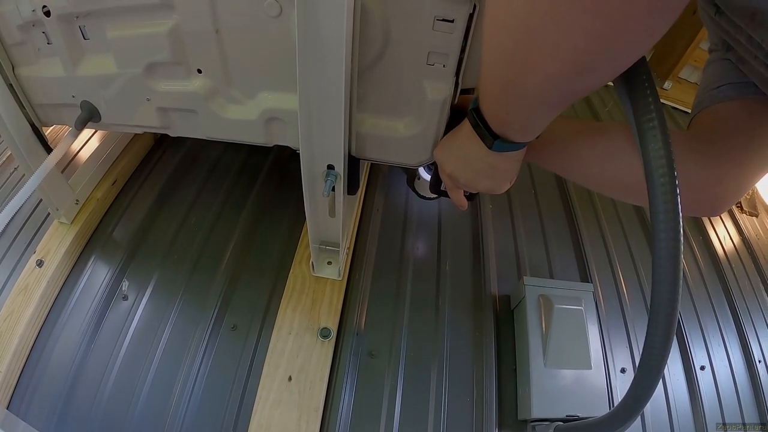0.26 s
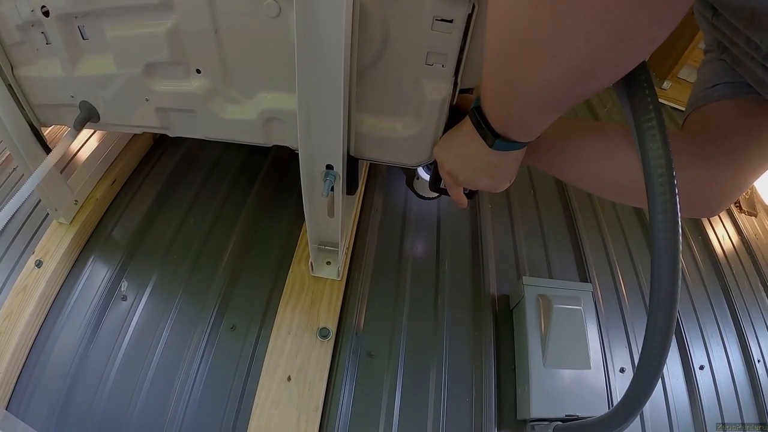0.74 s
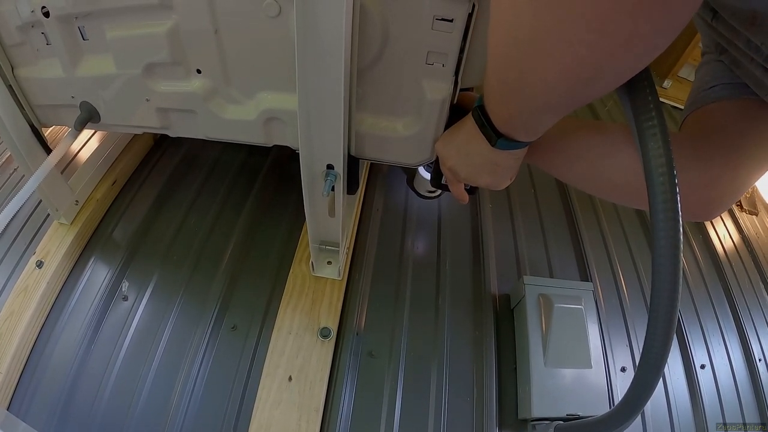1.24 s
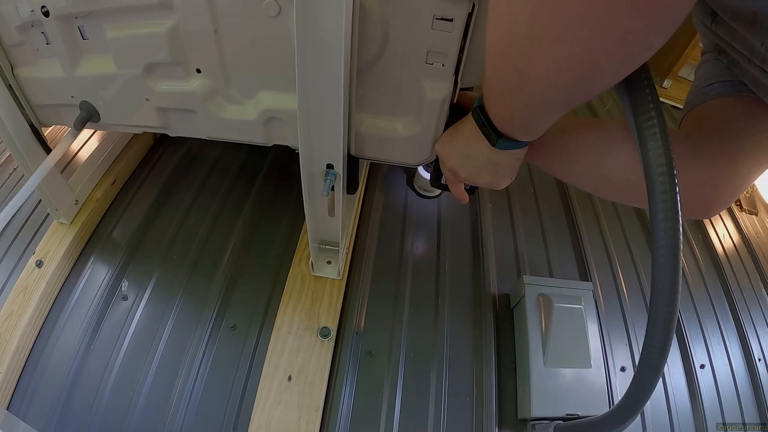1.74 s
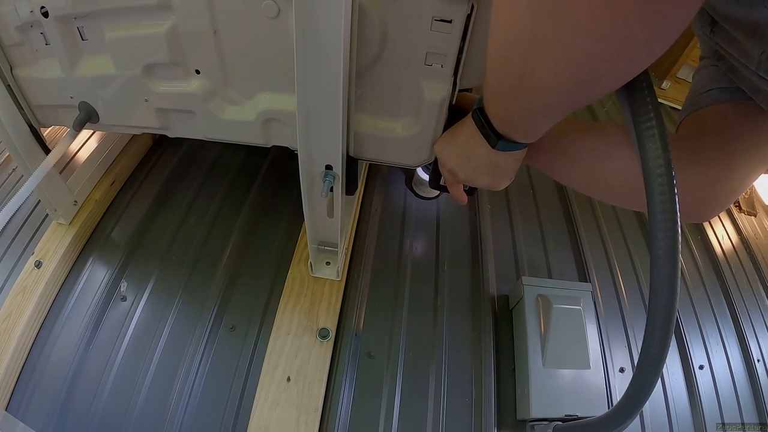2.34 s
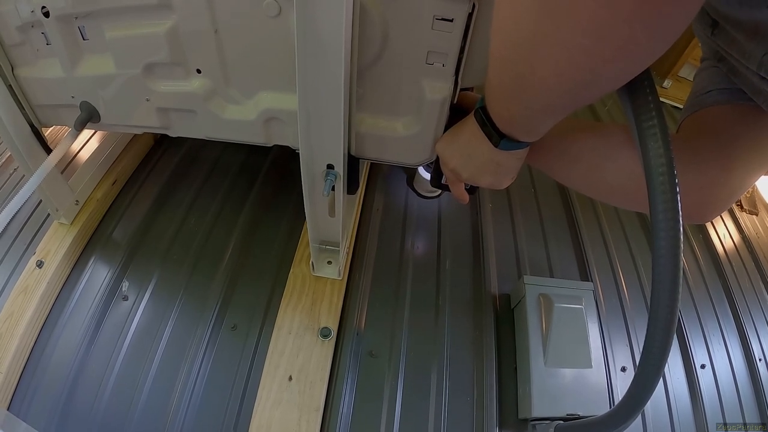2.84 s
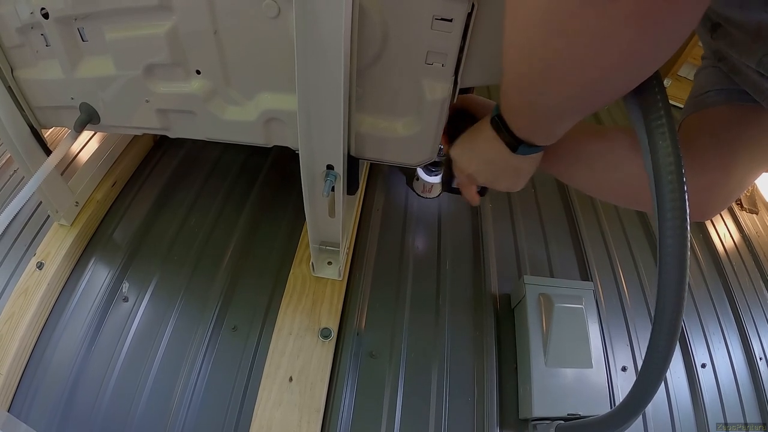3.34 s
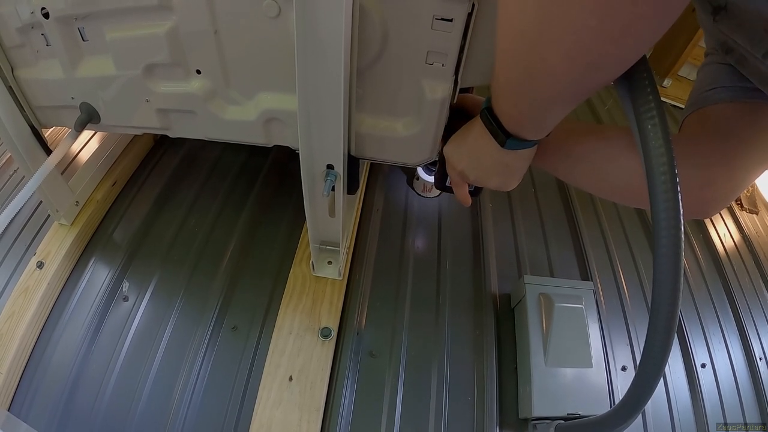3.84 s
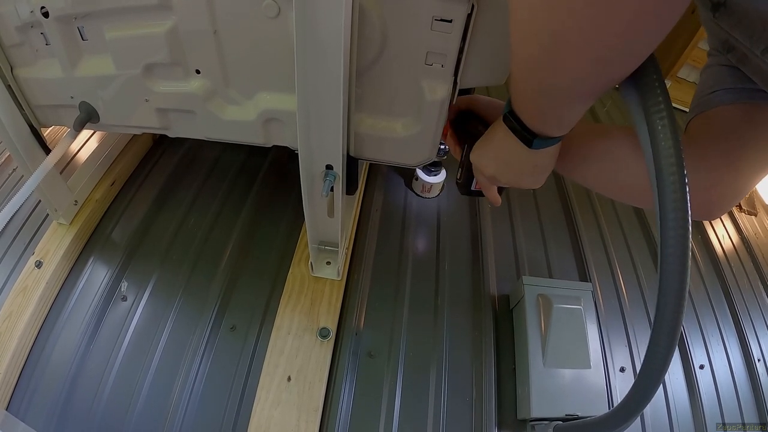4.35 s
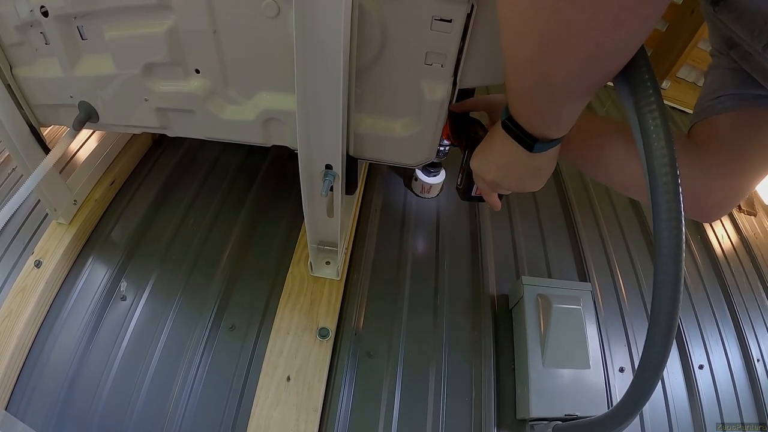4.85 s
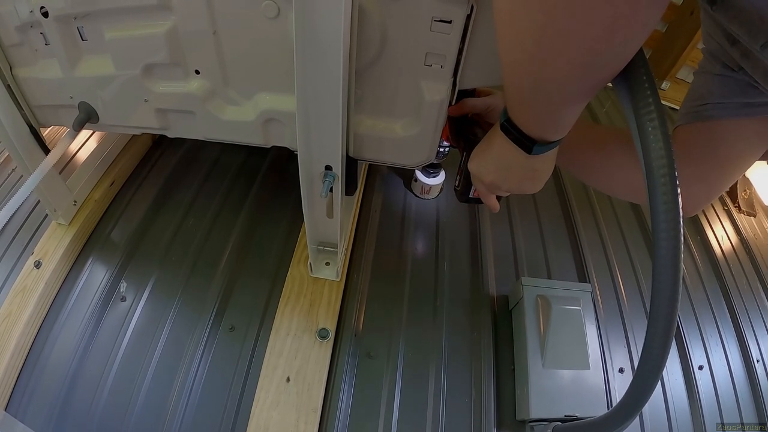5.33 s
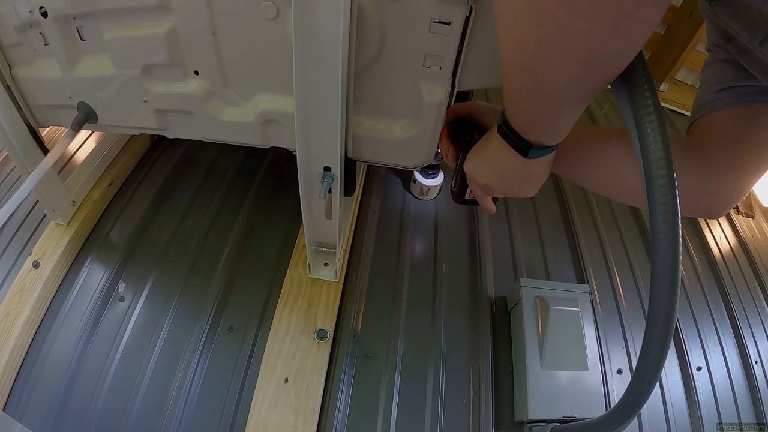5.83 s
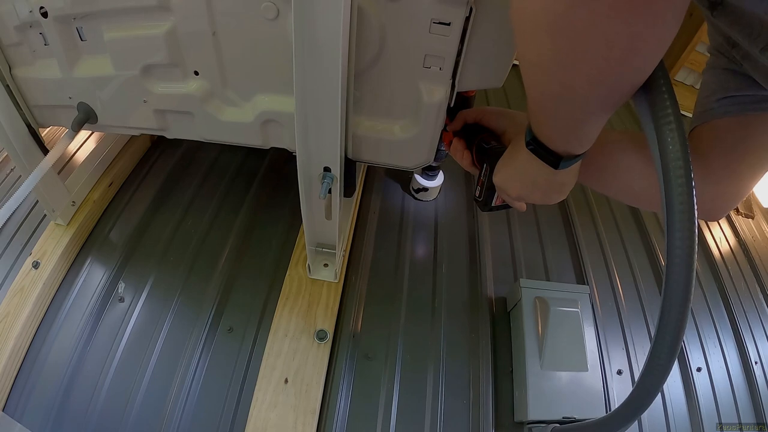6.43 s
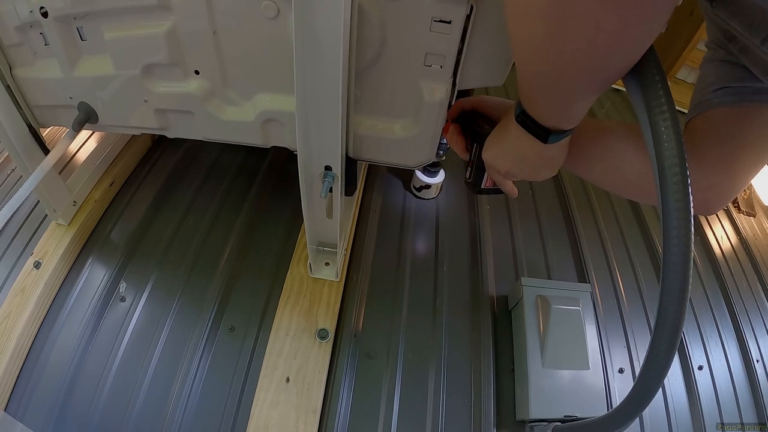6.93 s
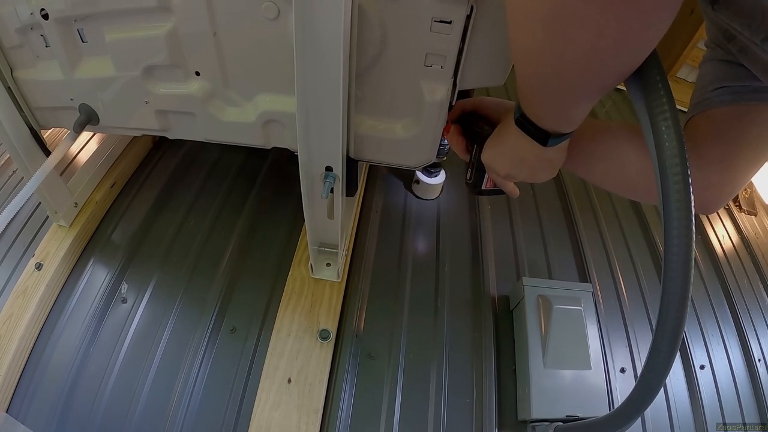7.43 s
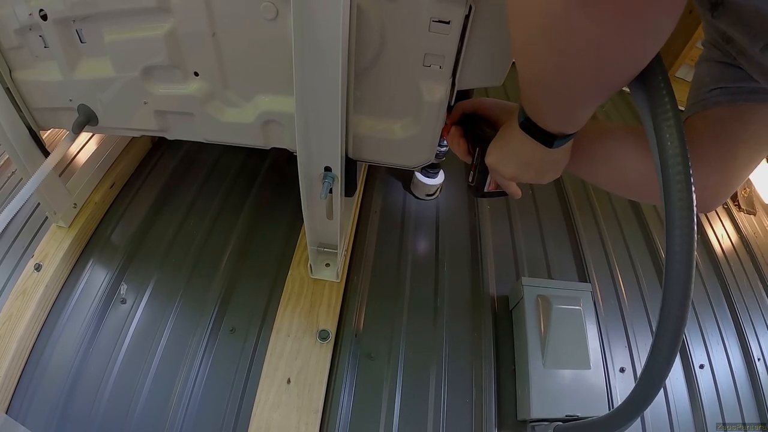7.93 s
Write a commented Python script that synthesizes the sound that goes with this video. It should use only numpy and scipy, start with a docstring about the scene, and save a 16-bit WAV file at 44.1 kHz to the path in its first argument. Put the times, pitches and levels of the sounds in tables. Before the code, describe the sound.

Soft bumps, then a cordless drill's hole saw grinds loudly through corrugated steel; after a pause it jams twice and bites hard, drumming and chattering.

```python
"""Soft bumps and ticks of handling (noise bursts) come over a rumble and hiss in a garage. Close to a mono
microphone, a cordless drill (harmonics of its shaft) then drives a hole saw through corrugated steel siding:
impulses excite the sheet's modes as drumming and rasp, and sliding tones give squeals and chatter. After one
long cut the saw is knocked back into its groove and a switch snaps; it jams twice on restarting, with faint
squeaks between, then bites hard. Sheet and garage ring on after each stop as decaying noise and modes."""
import sys
import numpy as np
from scipy import signal
from scipy.fft import rfft, irfft, next_fast_len
from scipy.io import wavfile
from scipy.ndimage import uniform_filter1d, map_coordinates

SR = 44100
rng = np.random.default_rng(int(sys.argv[2]) if len(sys.argv) > 2 else 0)


def materialize(psi):
    """Save the field psi as 16-bit PCM at rate SR to the path in sys.argv[1].

    A 1-D psi becomes a single channel; in a 2-D psi each row is a channel.
    """
    bounded = np.clip(np.atleast_2d(psi).T, -1, 1)
    quanta = np.round(bounded * 32767).astype(np.int16)
    wavfile.write(sys.argv[1], SR, quanta)


N = 360738

# Levels in the tables are relative: gains in the functions shift them.
# Rumble of the wall: (frequency [Hz], level [dB])
RUMBLE = [(15, -35), (24, -10.5), (45, -2.5), (62, -1), (91, -4), (206, -12), (400, -34), (900, -43),
          (2000, -73.5)]
# Faint hiss: (frequency [Hz], level [dB])
HISS = [(150, -6.5), (400, 6.5), (750, -9), (1400, -8), (2500, -17.5), (4100, -18), (8500, -30.5),
        (12000, -49), (15000, -72.5)]
# Course of the hiss: (time [s], level [dB])
HISS_LEVEL = [(1.25, -52), (3.9, -63.5), (4.8, -60.5), (5.95, -57.5), (6.5, -60.5)]
# The whole wall is set swaying and rumbles on: (time [s], level [dB])
SWAYS = [(0, -34.5), (3.351, -30.5), (4.3, -39), (6.1, -34), (6.75, -28)]
# The drill bumps softly on the wall: (time [s], bump level [dB], thud level [dB])
BUMPS = [(0.275, -25.5, -32), (0.573, -25, -25.5), (0.923, -49, -54.5), (1.226, -24, -28),
         (4.016, -39.5, -22.5), (6.596, -30, -45), (6.62, -28.5, -42)]
# Light ticks and scuffs from handling the drill: (time [s], level [dB])
TICKS = [(0.14, -49), (0.168, -42.5), (0.205, -40.5), (0.2527, -44), (0.295, -46), (0.3327, -40.5),
         (0.413, -43.5), (4.101, -55), (4.137, -47), (4.75, -51), (4.8247, -51), (4.99, -52.5),
         (5.603, -50.5), (5.6606, -46), (5.9534, -43.5), (6.637, -33)]
# Response to a bump on the wall: (frequency [Hz], level [dB])
WALL = [(100, -10.5), (330, -10), (510, 5), (700, -1), (1100, -9.5), (2000, -24), (3500, -27.5),
        (8500, -41.5), (11000, -58.5), (15000, -75)]
# Colour of ticks and scuffs: (frequency [Hz], level [dB])
SCUFF = [(300, 0), (1100, 13), (2200, 3.5), (3600, 1.5), (8000, -12.5), (15000, -27)]
# Each pull of the trigger: (start [s], stop [s], time for the teeth to take hold [s], drumming level [dB],
# rasp level [dB], starting-current level [dB], starting-current length [s])
RUNS = [(1.298, 3.323, 0.0088, -21, -24, -26.5, 0.074), (6.006, 6.193, 0.024, -17, -24.5, -26.5, 0.059),
        (6.683, 6.834, 0.018, -20.5, -24, -26.5, 0.058), (7.037, 8.2, 0.029, -20, -25, -32, 0.28)]
# Shaft speed that the motor can hold against the load: (time [s], speed [Hz])
SPEED = [(1.45, 355), (1.9, 355.5), (2.25, 353), (2.35, 317), (2.48, 290), (2.57, 293), (2.65, 335),
         (2.9, 345), (3.25, 308), (6.05, 145), (6.8, 140), (7.22, 288), (7.5, 284), (8.18, 230)]
# How hard the hand makes the teeth bite: (time [s], level [dB])
BITE = [(1.34, -2), (1.66, -2.5), (2.16, -2.5), (2.24, 4), (2.48, 0.5), (2.72, 0.5), (2.9, -1.5),
        (3.13, -0.5), (3.31, 3), (6.06, 4.5), (6.19, -1.5), (6.73, 6.5), (6.84, 2.5), (7.19, 3.5),
        (7.45, 0), (7.6, 4), (7.93, 7), (8.18, 4.5)]
# Gear whine: (multiple of the shaft rate, level [dB])
GEARS = [(4, 5), (8, -3), (13, -6), (16, -7)]
# Resonances of the housing, which the whines sweep through: (frequency [Hz], width [Hz], lift [dB])
HOUSING = [(1230, 260, 5), (3480, 300, 12), (4500, 120, 17), (5680, 160, 9)]
# Singing of the motor windings: (frequency [Hz], level [dB])
WINDINGS = [(300, -22.5), (1100, -5), (2600, -22), (3300, -6.5), (3640, 6), (3850, -8.5), (4100, -9),
            (7000, -31), (9500, -52), (9950, -18.5), (10400, -54), (15000, -60.5)]
# Bands of drumming, grinding and rasp: (lower edge [Hz], upper edge [Hz])
BANDS = [(20, 300), (300, 2200), (2200, 20000)]
# Broad response of the steel sheet: (frequency [Hz], level [dB])
SIDING = [(18, -62.5), (30, -23.5), (45, -8), (81, -3.5), (139, -6.5), (180, -2), (287, -8.5), (387, -11),
          (595, -15), (730, -10), (914, -16.5), (2600, -30), (3380, -57.5), (5720, -120)]
# Broad response of the saw's cup: (frequency [Hz], level [dB])
CUP = [(2200, 1.5), (2900, 0.5), (3700, 0), (5000, 0.5), (6300, -1.5), (7500, -8), (9800, -12),
       (11000, -23), (13000, -24.5), (15500, -34.5)]
# Resonances of the sheet and the cup: (frequency [Hz], width [Hz], lift [dB])
MODES = [(64, 13, -4), (93.5, 11, 5), (125.4, 19, 4.5), (184, 72, 4.5), (253.6, 18, 7.5), (341.3, 32, 5.5),
         (389.7, 54, 6), (507, 82, 6), (725.5, 12, 3), (815, 13, 5), (1094, 140, 2.5), (1484, 530, 7.5),
         (1775, 110, 3.5), (1969, 82, 7.5), (3614, 300, 5), (3970, 38, 10), (4580, 170, 3),
         (6140, 250, 2.5), (8700, 180, 2.5), (12200, 570, 3.5), (12800, 400, 5)]
# Decay once the trigger is let go: (drumming t60 [s], grinding t60 [s], rasp t60 [s])
RELEASE_S = (0.18, 0.094, 0.039)
# The saw strikes or snags on the sheet: (time [s], crack level [dB], boom level [dB], clang level [dB])
KNOCKS = [(1.3007, -22.5, -33, -26), (3.244, -26, -17, -11.5), (3.2997, -23.5, -11, -10),
          (3.4154, -41, -18, -27.5), (3.464, -48.5, -14.5, -22), (4.2941, -19.5, -13, -19.5),
          (4.3685, -24.5, -26, -25), (6.031, -22, -4.5, -20.5), (6.0644, -17.5, -17, -16),
          (6.7012, -24, -9.5, -14.5), (6.8261, -34, -9, -25), (7.5305, -20, -11.5, -10.5),
          (7.5878, -22.5, -10, -11), (7.656, -29, -15.5, -8.5), (7.6869, -24, -16, -17),
          (7.7439, -21.5, -12, -15.5), (7.7994, -28.5, -27, -9), (7.872, -24, -7.5, -22),
          (7.9313, -20.5, -14, -27), (8.1258, -27.5, -40, -11)]
# Colour of a snagging tooth: (frequency [Hz], level [dB])
CRACK = [(2200, 0.5), (4000, -2), (5500, -5), (7500, -17.5), (10000, -14), (13000, -27.5), (15500, -30.5)]
# Modal ring after a blow: (frequency [Hz], level re the crack [dB], t60 [s])
RING = [(62.7, -4.5, .73), (975, -8, .32), (1071, -7.5, .33), (1181, -9, .27), (1400, -8, .17),
        (1760, -8, .14), (1950, -9, .11), (3941, -16, .28), (4800, -12, .11)]
# Squeals and low hums of cup and sheet, and faint squeaks while the drill is stopped:
# (time [s], length [s], frequency [Hz], level [dB])
SQUEALS = [(1.38, 0.24, 537, -28.5), (1.56, 0.13, 1505, -28.5), (2.22, 0.59, 822, -33),
           (2.29, 0.12, 1504, -29), (2.34, 0.52, 526, -25), (2.597, 0.44, 329.7, -23.5),
           (2.78, 0.31, 820, -37), (2.85, 0.34, 1505, -32.5), (6.018, 0.32, 62.4, -24.5),
           (6.07, 0.056, 1537, -31), (6.384, 0.044, 2170, -68), (6.459, 0.051, 1770, -66),
           (6.58, 0.13, 2270, -52), (6.7, 0.086, 1500, -20), (6.701, 0.27, 63.9, -19),
           (7.07, 0.13, 62, -21), (7.17, 0.074, 3200, -32), (7.197, 0.11, 720, -24),
           (7.22, 0.06, 1500, -31), (7.6, 0.23, 740, -28), (8.04, 0.12, 725, -26)]
# The sheet locks into chatter against the teeth:
# (start [s], end [s], first frequency [Hz], last frequency [Hz], level [dB])
CHATTER = [(1.42, 1.602, 191.7, 190.9, -18.5), (1.68, 2.137, 188.6, 187.7, -18),
           (2.22, 2.354, 188, 183.6, -18.5), (2.41, 2.476, 131.3, 124.7, -17),
           (2.495, 2.579, 79, 79.4, -18.5), (2.63, 2.788, 186.8, 189, -16.5),
           (2.78, 3.04, 190.5, 185.7, -12.5), (3.04, 3.173, 184, 159, -23), (3.16, 3.275, 136.6, 120, -14),
           (6.765, 6.826, 167.2, 161.6, -14.5), (7.15, 7.259, 179.4, 156, -12),
           (7.265, 7.361, 156.7, 180.9, -10), (7.345, 7.447, 166.3, 170.1, -10.5),
           (7.46, 7.58, 174, 174.2, -11), (7.59, 7.681, 166.3, 157.7, -12), (7.84, 7.916, 212.6, 237, -14),
           (7.975, 8.032, 237, 210.6, -16), (8.055, 8.134, 200.8, 227.5, -13)]
# Overtones of the chatter: (multiple, level [dB])
FLAP = [(1, 0), (2, -16), (3, -20), (4, -22)]
# The teeth drag lightly over the edge of the hole: (start [s], end [s], level [dB])
DRAGS = [(3.325, 3.42, -31.5), (3.455, 3.486, -27.5), (4.273, 4.291, -36.5)]
# Colour of the dragging teeth: (frequency [Hz], level [dB])
SCRAPE = [(120, -13.5), (300, 2), (700, 5.5), (1400, -8.5), (2400, -18.5), (4500, -25.5), (8000, -39),
          (15000, -58)]
# A switch on the drill snaps over: (time [s], snap level [dB], thud level [dB])
CLICKS = [(5.3447, -3, -25.5)]
# Response of the drill's casing: (frequency [Hz], level [dB])
CASING = [(400, -37.5), (700, -20), (1060, -7), (1950, -12), (2600, -8.5), (4200, 3.5), (4900, -3.5),
          (5600, 3), (7300, -4), (10000, -13), (15500, -36)]
# Reverberation time of the garage: (frequency [Hz], t60 [s])
GARAGE = [(60, 1), (200, 0.61), (500, 0.65), (1200, 0.44), (4000, 0.21), (12000, 0.087)]

SWAY_T60_S, RUMBLE_DB = 2.8, -55  # decay of the sway; the rumble that is always there
FREE_HZ, LABOUR_HZ = 366, 293  # shaft speed with no load, and with the teeth fully sunk
SPIN_DELAY_S, SPIN_UP_S, BRAKE_S = .022, .036, .06  # the motor hesitates, then gathers and loses speed
# gear whine; its lift while the motor pulls up, half of it at this acceleration
WHINE_DB, SURGE_DB, SURGE_HZ_PER_S = -41.5, 21, 2200
GEARING, REPEAT_SHARE = 11.3, .5  # shaft turns per turn of the saw; share of cutting that recurs each turn
GRIND_DB = -21  # relative level of grinding at a bite of 0 dB
DRUM_PER_BITE, RASP_PER_BITE = 0.36, 0.25  # dB for each dB of bite
SUNK_DRUM_DB, SUNK_RASP_DB = 2.5, -5.5  # sunk teeth shake the sheet more and rasp less
DEEPEN_DRUM_DB_PER_S, DEEPEN_RASP_DB_PER_S = 4, -0.8  # and so does a groove that deepens
HARD_DB = -30  # a weaker crack than this leaves the modes almost still
CHATTER_FADE_S = .03  # each bout builds up and dies away
TOP_HZ = 15700  # band limit


def amp(db):
    """Level to amplitude: 20 dB is a factor of ten."""
    return 10 ** (np.asarray(db) / 20)


def unit(x):
    """Normalise the root mean square to 1."""
    return x / np.sqrt(np.mean(x ** 2) + 1e-20)


def along(points, hz):
    """Interpolate a spectrum linearly over log frequency."""
    f, v = np.transpose(points)
    return np.interp(np.log(hz + 1), np.log(f + 1), v)


def curves(rows):
    """Interpolate each column after the time to one value per sample."""
    s, *cols = np.transpose(rows)
    return [np.interp(np.arange(N) / SR, s, c) for c in cols]


def gate(start, end, fade):
    """Window of 1 from start to end, with linear edges outside."""
    t = np.arange(N) / SR
    return np.clip(1 + np.minimum((t - start) / 0.0048, (end - t) / fade), 0, 1)


def envelope(start, attack, stop, t60):
    """Build-up from start, steady state until stop, then exponential decay."""
    t = np.arange(N) / SR
    rise = 1 - np.exp(-(np.maximum(t - start, 0) / attack) ** 2)
    return rise * amp(-60 * np.clip((t - stop) / t60, 0, 3))


def wobble(rate):
    """Slow random modulation: a smooth curve through rate random knots a second."""
    knots = rng.standard_normal(int(N * rate / SR) + 4)
    coarse = np.arange(0, N, 16)
    return np.interp(np.arange(N), coarse, map_coordinates(knots, [coarse * rate / SR]))


def add(track, s, sound):
    """Superpose a sound on a track at time s."""
    part = track[max(round(s * SR), 0):][:len(sound)]
    part += sound[:len(part)]


def body(level_db, size=16384):
    """Minimum-phase impulse response of energy 1, from the cepstrum of a gain in dB by frequency."""
    db = level_db(np.fft.rfftfreq(size, 1 / SR))
    cepstrum = irfft(np.log(amp(db - db.max()) + 1e-6))
    # folding the cepstrum onto positive times makes the response causal
    cepstrum[1:size // 2] *= 2
    cepstrum[size // 2 + 1:] = 0
    response = irfft(np.exp(rfft(cepstrum)))[:size // 2]
    return response / np.linalg.norm(response)


def through(x, response):
    """A linear body answers by convolution with its impulse response."""
    return signal.oaconvolve(x, response)[:len(x)]


def coloured(x, spectrum):
    """Filter x by a body with the given spectrum."""
    return through(x, body(lambda hz: along(spectrum, hz)))


def noise(spectrum):
    """Stationary random noise with the given spectrum, rms about 1."""
    return coloured(rng.standard_normal(N), spectrum)


def burst(t60, attack, size=22050):
    """Transient noise: a quick onset, then exponential decay from rms 1."""
    t = np.arange(size) / SR
    return rng.standard_normal(size) * amp(-60 * t / t60) * (1 - np.exp(-t / attack))


def peaks(resonances, hz):
    """Resonance curves: each lift halves at half its width from the centre."""
    return sum(db / (1 + (2 * (hz - centre) / width) ** 2) for centre, width, db in resonances)


def sheet(spectrum, lo, hi):
    """Modal response of the steel within one band."""
    def level_db(hz):
        edges = -10 * np.log10((1 + (lo / (hz + 1)) ** 10) * (1 + (hz / hi) ** 10))
        return along(spectrum, hz) + peaks(MODES, hz) + edges
    return body(level_db)


def background():
    """Random vibration: a low uneven rumble swells and decays with each sway of the wall, over a faint hiss."""
    sway = sum(amp(db) * envelope(s, 0.0091, s, SWAY_T60_S) for s, db in SWAYS)
    rumble = np.hypot(amp(RUMBLE_DB), sway) * amp(1.5 * wobble(2.0))
    return rumble * noise(RUMBLE) + amp(curves(HISS_LEVEL)[0]) * noise(HISS)


def handling():
    """Impact excitation: soft bumps make the wall thud; grip and saw scuff lightly."""
    bump, thud, scuff = np.zeros((3, N))
    for s, db, thud_db in BUMPS:
        add(bump, s, amp(db - 7.5) * burst(t60=.17, attack=.0015))
        add(thud, s, amp(thud_db - 2.5) * burst(t60=0.27, attack=0.0027))
    for s, db in TICKS:
        add(scuff, s, amp(db - 4) * burst(t60=.07, attack=.0006))
    thud_hz_db = [(60, -8.5), (170, 3.5), (290, -1.5), (450, -20.0), (1500, -66.0)]
    return coloured(bump, WALL) + coloured(scuff, SCUFF) + coloured(thud, thud_hz_db)


def motor():
    """Inertia delays the shaft: its speed, how far the teeth are sunk (0-1) and seconds since the trigger."""
    t = np.arange(N) / SR
    held = curves(SPEED)[0]
    starts, stops = np.transpose(RUNS)[:2]
    run = np.maximum(np.searchsorted(starts, t) - 1, 0)
    age = np.maximum(t - starts[run], 0)
    spin_up = 1 - np.exp(-np.maximum(age - SPIN_DELAY_S, 0) / SPIN_UP_S)
    speed = held * spin_up * np.exp(-np.maximum(t - stops[run], 0) / BRAKE_S)
    sunk = np.clip((FREE_HZ - held) / (FREE_HZ - LABOUR_HZ), 0, 1)
    return speed, sunk, age


def drill(strain_db=30, sunk_db=-2, fade_db_per_s=-4):
    """Rotational harmonics: gear whine tracks the shaft and grows with speed; windings sing at each pull."""
    speed, sunk, age = motor()
    # a loaded motor runs less evenly and its whine is duller
    load = sunk * np.maximum(1 - speed / FREE_HZ, 0)
    uneven_hz = speed + .35 * wobble(30) + 7 * load * wobble(150)
    phase = 2 * np.pi * np.cumsum(uneven_hz) / SR
    whine = np.zeros(N)
    for order, level in GEARS:
        dulling_db = strain_db * load * abs(np.log2(order / GEARS[0][0]))
        tone_db = level + peaks(HOUSING, order * speed) - dulling_db + 1.8 * wobble(28)
        whine += amp(tone_db) * np.sin(order * phase)
    current = sum(amp(level) * gate(s + 0.0036, s + length, fade=.03) for s, *_, level, length in RUNS)
    pull = np.maximum(np.gradient(speed) * SR, 0)
    surge_db = SURGE_DB * pull / (pull + SURGE_HZ_PER_S)
    # the whine weakens after the first second of a cut
    db = WHINE_DB + surge_db + sunk_db * sunk + fade_db_per_s * np.maximum(age - 1, 0)
    return amp(db) * np.sqrt(speed / FREE_HZ) * whine + current * noise(WINDINGS)


def forces(drum_lag=1.9):
    """Driving forces of drumming, grinding and rasp; the heavy sheet is the slowest to get going."""
    bite_db = curves(BITE)[0]
    speed, sunk, age = motor()
    drum, grind, rasp = np.zeros((3, N))
    for start, stop, attack, drum_db, rasp_db, *_ in RUNS:
        drum += amp(drum_db) * envelope(start, drum_lag * attack, stop, RELEASE_S[0])
        grind += amp(GRIND_DB) * envelope(start, attack, stop, RELEASE_S[1])
        rasp += amp(rasp_db) * envelope(start, attack, stop, RELEASE_S[2])
    drum_lift_db = DRUM_PER_BITE * bite_db + SUNK_DRUM_DB * sunk + DEEPEN_DRUM_DB_PER_S * age
    rasp_lift_db = RASP_PER_BITE * bite_db + SUNK_RASP_DB * sunk + DEEPEN_RASP_DB_PER_S * age
    return drum * amp(drum_lift_db), grind * amp(bite_db), rasp * amp(rasp_lift_db)


def bout(start, end):
    """Self-excited vibration builds up, holds and dies away."""
    t = np.arange(N) / SR
    return np.clip(.5 + np.minimum(t - start, end - t) / CHATTER_FADE_S, 0, 1)


def chips(rate, spread_db):
    """Shot noise of rms 1: random impulses of uneven size as bits of steel tear off."""
    hits = rng.random(N) < rate / SR
    return unit(hits * rng.standard_normal(N) * amp(spread_db * rng.standard_normal(N)))


def burrs(turns, count):
    """Periodic excitation: the teeth meet the same burrs each turn, until these wear away; rms 1 in the runs."""
    laps = np.arange(int(turns[-1]) + 1)[:, None]
    # averaging over seven turns lets each burr change slowly
    height = uniform_filter1d(rng.standard_normal((len(laps), count)), size=7, axis=0)
    at = np.interp((laps + rng.random(count)).ravel(), turns, np.arange(N))
    at, height = at[at < N - 1], height.ravel()[at < N - 1]
    # each hit is shared between the two nearest samples
    whole = at.astype(int)
    hits = np.bincount(whole, height * (1 - at + whole), N)
    hits += np.bincount(whole + 1, height * (at - whole), N)
    return unit(hits) * np.sqrt(sum(stop - start for start, stop, *_ in RUNS) * SR / N)


def shifting(x, depth_db):
    """Modal excitation depends on place: as contact travels round the groove, the favoured modes change."""
    z = signal.stft(x, nperseg=1024)[2]
    over_hz = uniform_filter1d(rng.standard_normal(z.shape), size=4, axis=0)
    field = uniform_filter1d(over_hz, size=5, axis=1)
    return signal.istft(z * unit(amp(depth_db * unit(field))), nperseg=1024)[1][:N]


def cutting(siding, teeth=12, bite_db=-2.0, runout_db=0.75):
    """Forced vibration: teeth tear chips and rattle over burrs, as pressure sways each turn and the hand wavers."""
    speed = motor()[0]
    turns = np.cumsum(speed * (1 + .0015 * wobble(20))) / SR / GEARING
    turn = 2 * np.pi * turns
    pressure = unit(amp(bite_db * np.sin(teeth * turn) + runout_db * np.sin(turn) + 0.16 * wobble(55)))
    fresh = np.sqrt(1 - REPEAT_SHARE * np.minimum(speed / LABOUR_HZ, 1))

    def tear(chip, count):
        return pressure * (fresh * chip + np.sqrt(REPEAT_SHARE) * burrs(turns, count))

    drum_force, grind_force, rasp_force = forces()
    # chatter takes over from random drumming
    locked = np.minimum(sum(bout(start, end) for start, end, *_ in CHATTER), 1)
    drum_hits = tear(chips(rate=2500, spread_db=1.5), count=90)
    grind_hits = tear(chips(rate=3500, spread_db=2.0), count=140)
    rasp_hits = tear(chips(rate=7000, spread_db=2.5), count=300)
    drum = through(drum_force * amp(-4.0 - 2.4 * locked) * drum_hits, siding[0])
    grind = through(grind_force * amp(-3.5) * grind_hits, siding[1])
    rasp = through(rasp_force * amp(-2.5) * rasp_hits, siding[2])
    return drum + shifting(grind + rasp, depth_db=2.0)


def ringing(hz, t60, width_hz=27):
    """Free decay of a mode of the loose sheet; its phase drifts at random as it rattles."""
    t = np.arange(SR) / SR
    drift = np.cumsum(rng.standard_normal(SR)) * np.sqrt(2 * np.pi * width_hz / SR)
    return amp(-60 * t / t60) * np.sin(2 * np.pi * hz * t + drift)


def knocks(siding):
    """Impulsive excitation: each blow cracks and clangs and leaves the sheet booming and ringing."""
    boom, clang, crack, ring = np.zeros((4, N))
    for s, crack_db, boom_db, clang_db in KNOCKS:
        # a running saw presses on the sheet
        damped_db = -5 * any(start < s < stop for start, stop, *_ in RUNS)
        add(boom, s, amp(boom_db + damped_db) * burst(t60=0.21, attack=0.0014))
        add(clang, s, amp(clang_db + damped_db) * burst(t60=.16, attack=.0012))
        add(crack, s, amp(crack_db) * burst(t60=0.15, attack=0.0029))
        # only hard contacts set the modes ringing
        ring_db = crack_db + damped_db + min(crack_db - HARD_DB, 0)
        add(ring, s, amp(ring_db) * sum(amp(db) * ringing(hz, t60) for hz, db, t60 in RING))
    struck = through(boom, siding[0]) + through(clang, siding[1])
    return ring + struck + through(crack, sheet(CRACK, *BANDS[2]))


def squeals():
    """Frequency and amplitude modulation: single sliding tones waver in pitch, swell and fade."""
    out = np.zeros(N)
    for s, length, hz, db in SQUEALS:
        swell = signal.windows.tukey(int(length * SR))
        waver = (.004 * wobble(100) + .009 * wobble(14))[:len(swell)]
        phase = 2 * np.pi * np.cumsum(hz * (1 + waver)) / SR
        add(out, s, amp(db) * swell * np.sin(phase))
    return out


def chatter():
    """Self-excited vibration: the sheet flaps at a low mode; its pitch slides as the teeth pull on it."""
    out, t = np.zeros(N), np.arange(N) / SR
    waver, flutter = 1 + .014 * wobble(45), amp(1.5 * wobble(30) - 3.6)
    for start, end, first_hz, last_hz, db in CHATTER:
        swell = bout(start, end)
        on = swell > 0
        slide_hz = np.interp(t[on], [start, end], [first_hz, last_hz])
        phase = 2 * np.pi * np.cumsum(slide_hz * waver[on]) / SR
        out[on] += amp(db) * swell[on] * sum(amp(level) * np.sin(k * phase) for k, level in FLAP)
    return np.sqrt(2) * flutter * out


def drags():
    """Sliding friction: coasting or sliding teeth scrape the sheet in uneven little slips."""
    contact = sum(amp(db) * envelope(start, 0.0022, end, .13) for start, end, db in DRAGS)
    return coloured(contact * amp(3.3 * wobble(70)) * chips(rate=2500, spread_db=3.5), SCRAPE)


def clicks():
    """Structure-borne impact: the switch snaps in the hard casing and a thud passes on to the wall."""
    snap, thud = np.zeros((2, N))
    for s, db, thud_db in CLICKS:
        add(snap, s, amp(db) * (burst(t60=.016, attack=.002) + amp(-17) * burst(t60=.12, attack=.004)))
        add(thud, s, amp(thud_db) * burst(t60=0.43, attack=0.0066))
    thud_hz_db = [(50, -2.5), (170, 3.5), (300, -1.0), (480, -10.0), (800, -27.0), (2500, -42.5)]
    return coloured(snap, CASING) + coloured(thud, thud_hz_db)


def garage(x):
    """Reverberation: the diffuse tail of walls and siding decays exponentially, longest in the bass."""
    hz, t, z = signal.stft(rng.standard_normal(3 * SR // 2), SR, nperseg=256)
    decay = amp(-60 * t / along(GARAGE, hz)[:, None])
    tail = signal.istft(z * decay / np.linalg.norm(decay, axis=1, keepdims=True), SR, nperseg=256)[1]
    wet_hz_db = [(60, -2.5), (300, 0.0), (1200, -2.0), (4000, -6), (12000, -5.0)]
    delayed_tail = np.pad(tail / np.linalg.norm(tail), (int(.008 * SR), 0))
    return through(coloured(x, wet_hz_db), delayed_tail)


def scene():
    """Superposition: all sources add and reach both channels alike."""
    siding = [sheet(spectrum, *band) for spectrum, band in zip([SIDING, SIDING, CUP], BANDS)]
    work = handling() + drill() + cutting(siding) + knocks(siding) + squeals() + drags() + clicks()
    mono = background() + work + chatter() + amp(-13.0) * garage(work)
    return np.array([mono, mono])


def record(dry):
    """Saturation rounds off the loudest peaks; a band limit then removes all above it."""
    soft = dry / (1 + np.abs(dry / .85) ** 6) ** (1 / 6)
    size = next_fast_len(N + 8192)
    passed = np.fft.rfftfreq(size, 1 / SR) < TOP_HZ
    return irfft(rfft(soft, size) * passed, size)[:, :N]


dry = scene()
out = record(dry)
materialize(out)
```